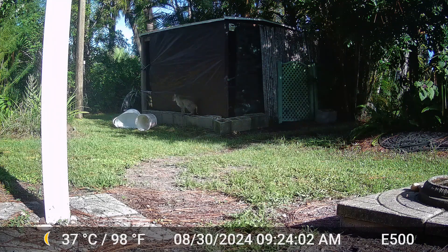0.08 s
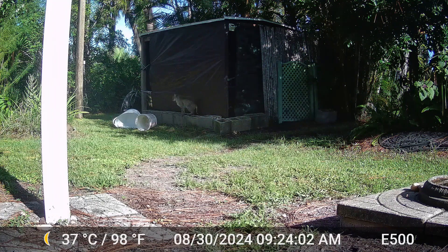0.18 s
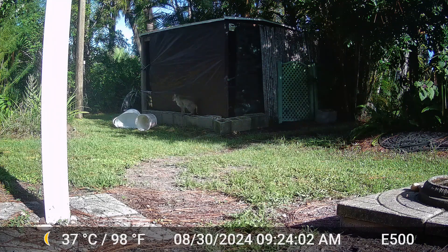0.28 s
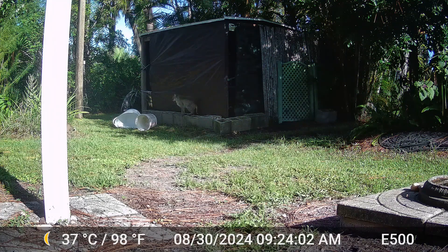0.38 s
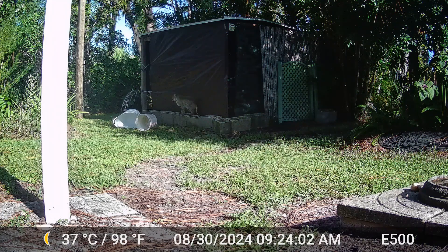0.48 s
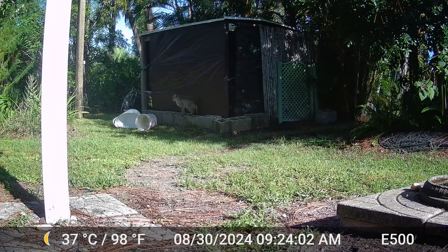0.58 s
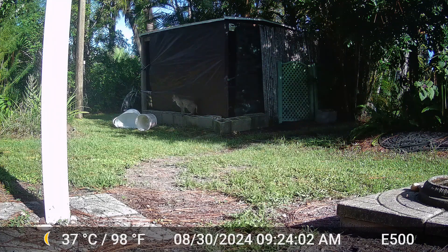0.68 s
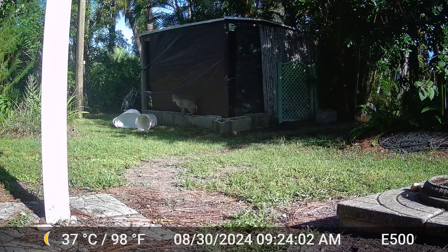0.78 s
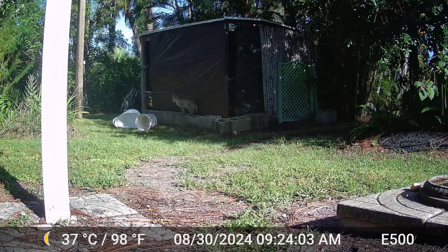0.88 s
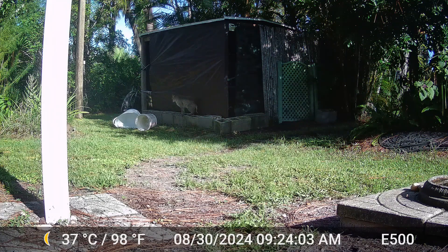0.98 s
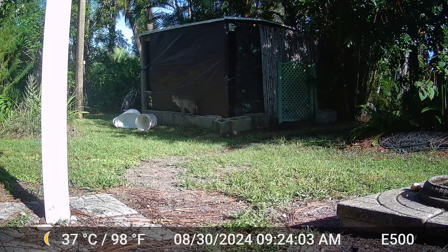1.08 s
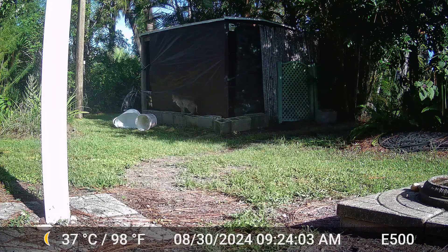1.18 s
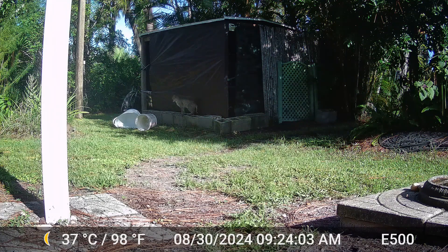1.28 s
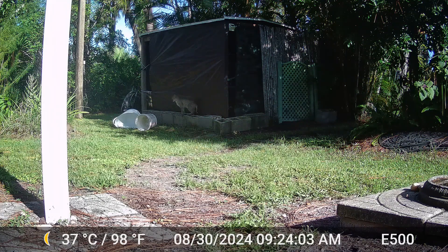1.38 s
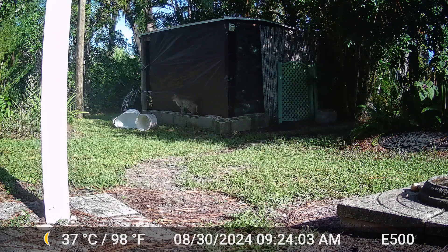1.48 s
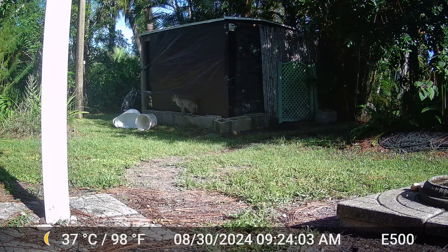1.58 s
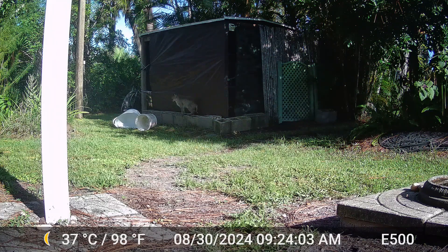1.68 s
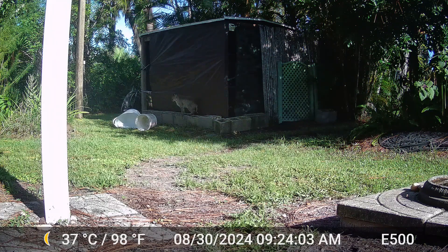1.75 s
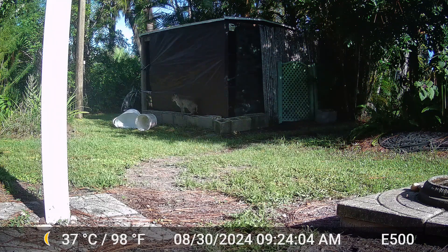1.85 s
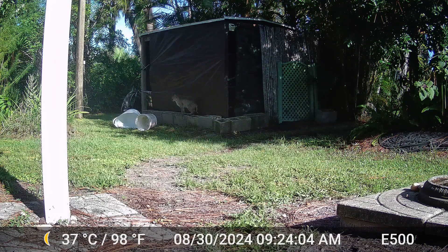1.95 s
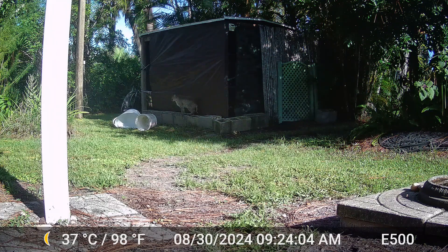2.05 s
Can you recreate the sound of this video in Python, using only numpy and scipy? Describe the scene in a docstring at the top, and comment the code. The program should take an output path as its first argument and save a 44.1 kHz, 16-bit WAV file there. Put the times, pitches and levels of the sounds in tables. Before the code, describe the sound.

Steady motor-like electronic buzzing, about thirty pulses a second, with irregular ticks and small spits of hiss; one loud crackle near the start, and a few dull, distant bucket knocks outdoors, on a noisy mono camera microphone.

```python
"""An outdoor camera's own electrical noise is the loudest part: a low flutter of one supply dip per frame,
irregular ticks, a throb and whine tied to the frame rate, spits of resonant hiss, one crackle of three deep dips.
Small animals nudge plastic buckets: a few faint, hollow knocks, each a handful of decaying sine modes.
Low rumble, housing resonances and thin hiss, all filtered noise, lie underneath."""
import sys
import numpy as np
from scipy import signal
from scipy.fft import rfft, irfft
from scipy.io import wavfile

SR = 44100
rng = np.random.default_rng(int(sys.argv[2]) if len(sys.argv) > 2 else 0)


def unload_wav(signal):
    """Save mono or channel-first audio to the path in sys.argv[1] as 16-bit WAV at rate SR, clipped to [-1, 1]."""
    wavfile.write(
        sys.argv[1],
        SR,
        np.round(np.clip(np.atleast_2d(signal).T, -1, 1) * 32767).astype(np.int16),
    )


N = 92610
T = np.arange(N) / SR
FRAME_HZ, FIRST_FRAME_S = 29.995, 0.0072
TICK_EDGE_S = 0.000097  # smoothing of frame ticks and stray ticks


def from_db(db):
    """Decibels to gain."""
    return 10 ** (np.asarray(db) / 20)


def rms_one(x):
    """Scale to unit power."""
    return x / np.sqrt(np.mean(x ** 2) + 1e-20)


def clicks(times_s, sizes):
    """Single-sample clicks at the given times."""
    at = np.round(np.asarray(times_s) * SR).astype(int)
    inside = (at >= 0) & (at < N)
    weights = (sizes * np.ones(len(at)))[inside]
    return np.bincount(at[inside], weights, N) + 1e-18


def soften(x, seconds):
    """One-pole smoothing with the given time constant."""
    r = np.exp(-1 / (seconds * SR))
    return signal.lfilter([1 - r], [1, -r], x)


def coloured_noise(spectrum):
    """Steady noise of the given spectrum, falling away above its last point; rms 1."""
    hz, db = np.transpose(spectrum)
    f = np.maximum(np.arange(N // 2 + 1) * SR / N, 1)
    gain = from_db(np.interp(np.log(f), np.log(hz), db))
    gain = gain / np.maximum(f / hz[-1], 1) ** 2
    return rms_one(irfft(rfft(rng.standard_normal(N)) * gain, N))


def resonant_noise(resonances):
    """Noise through two equal band-pass stages per resonance, each band at its own rms level."""
    out = 0
    for hz, width_hz, db in resonances:
        r = np.exp(-np.pi * width_hz / SR)
        section = [1 - r, 0, r - 1, 1, -2 * r * np.cos(2 * np.pi * hz / SR), r * r]
        band = signal.sosfilt([section, section], rng.standard_normal(N))
        out = out + from_db(db) * rms_one(band)
    return out


def coupling(edges):
    """Voltage steps pass the microphone input's high-pass: each jumps, sags and swings back."""
    corner_hz, q = 78.6, 0.75
    w = 2 * np.pi * corner_hz / SR
    b, a = signal.bilinear([1, 0, 0], [1, w / q, w * w], 1)
    return signal.lfilter(b, a, np.cumsum(edges))


def background(strength_db):
    """Low rumble that swells with the flutter, air coloured by the housing, and hiss."""
    # Spectra. Each row: frequency in Hz, relative density in dB per Hz.
    rumble_spectrum = [(20, 3.5), (35, -5), (60, 0.5), (115, -7.5), (160, -9), (230, -6), (380, -17),
                       (620, -25.5), (1000, -30)]
    hiss_spectrum = [(300, 7.5), (1000, -5.5), (2000, -8), (3200, -7), (5000, -10.5), (8000, -20),
                     (11000, -22), (13000, -28), (15500, -36)]
    # Housing resonances. Each row: frequency in Hz, width of one stage in Hz, level in dB.
    housing = [(460.3, 117, -59.5), (605.5, 166, -58.5), (810, 190, -65)]
    rumble_base_db, follow_db_per_db, hiss_db = -42.5, 0.64, -57
    rumble_gain = from_db(rumble_base_db + follow_db_per_db * strength_db)
    rumble = rumble_gain * coloured_noise(rumble_spectrum)
    hiss = from_db(hiss_db) * coloured_noise(hiss_spectrum)
    return rumble + resonant_noise(housing) + hiss


def stray_ticks():
    """Irregular electrical ticks: randomly timed decaying pulses of either polarity."""
    rate_per_s, median_db, spread_db, decay_s = 70, -45, 3.5, 0.0003
    born = rng.random(N) < rate_per_s / SR
    level_db = median_db + spread_db * np.clip(rng.standard_normal(N), -2, 2)
    impulses = born * rng.choice([-1, 1], N) * from_db(level_db) + 1e-18
    pulses = soften(impulses, decay_s) * decay_s * SR  # undo the smoothing's peak loss
    return soften(pulses, TICK_EDGE_S)


def throb():
    """Now and then a low hum swells up, two cycles to a frame."""
    # Swells. Each row: centre in seconds, Gaussian half width (to 1/e) in seconds, peak level in dB.
    throbs = [(0.01, 0.018, -36), (0.483, 0.014, -38), (0.774, 0.031, -29), (1.245, 0.031, -31.5),
              (1.316, .02, -29), (1.50, 0.027, -37.5)]
    crest_delay_s = 0.0078  # after a frame start
    swell = sum(from_db(db) * np.exp(-((T - s) / width_s) ** 2) for s, width_s, db in throbs)
    return swell * np.cos(2 * np.pi * 2 * FRAME_HZ * (T - FIRST_FRAME_S - crest_delay_s))


def whine():
    """Narrow-band noise restarts late in each frame and decays exponentially."""
    # Bands. Each row: frequency in Hz, width of one stage in Hz, level in dB before the decay.
    bands = [(5220, 400, -64.5), (10900, 720, -75)]
    delay_s, decay_s = 0.02, 0.006
    age_s = (T - FIRST_FRAME_S - delay_s) % (1 / FRAME_HZ)
    return np.exp(-age_s / decay_s) * resonant_noise(bands)


def flutter(strength_db):
    """Every frame steps the supply softly down, more firmly up, and adds a few thin ticks."""
    # Ticks in a frame. Each row: delay in seconds, level in dB, width in seconds, polarity.
    ticks = [(0.0002, -43.5, 0.00056, -1), (0.0058, -37, 0.00026, 1), (0.0199, -37.5, 0.00033, -1)]
    dip_s, fall_s, rise_s = 0.0073, 0.00072, 0.00032
    fall_db, rise_db = -31, -21.5  # step sizes at 0 dB strength
    strength_jitter_db, tick_jitter_db = 0.32, 1.5
    starts_s = FIRST_FRAME_S + np.arange(int(N / SR * FRAME_HZ) + 1) / FRAME_HZ
    frames = len(starts_s)
    frame_db = np.interp(starts_s, T, strength_db)
    size = from_db(frame_db + strength_jitter_db * rng.standard_normal(frames))
    rises = clicks(starts_s + dip_s, size * from_db(rise_db))
    falls = clicks(starts_s, size * from_db(fall_db))
    edges = soften(soften(rises, rise_s), rise_s) - soften(falls, fall_s)
    for delay_s, db, width_s, polarity in ticks:
        step = np.sign(polarity) * from_db(db + tick_jitter_db * rng.standard_normal(frames))
        pulse = clicks(starts_s + delay_s, step) - clicks(starts_s + delay_s + width_s, step)
        edges = edges + soften(pulse, TICK_EDGE_S)
    return coupling(edges)


def buckets():
    """Each knock pushes a bucket's wall for a few cycles, then its modes ring down briefly."""
    # Knocks. Each row: start in seconds, level in dB, pitch of the hollow in Hz.
    knocks = [(0.118, -34, 157.2), (0.578, -38, 460), (0.642, -36, 452), (1.107, -31.5, 611),
              (1.216, -35, 626), (1.372, -40, 585), (1.776, -38.5, 787)]
    # Modes. Each row: multiple of the pitch, level relative to the knock in dB, t60 in seconds.
    modes = [(1, -2.5, 0.05), (1.24, -21, 0.04), (2.2, -22, .04)]
    contact_s, contact_cycles = 0.0015, 3.6  # added together: length of the push
    out = np.zeros(N)
    for s, db, pitch_hz in knocks:
        age_s = np.maximum(T - s, 0)
        push_s = contact_cycles / pitch_hz + contact_s
        attack = np.minimum(age_s / push_s, 1)
        for multiple, mode_db, t60_s in modes:
            decay_db = 60 * np.maximum(age_s - push_s, 0) / t60_s
            envelope = attack * from_db(db + mode_db - decay_db)
            out += envelope * np.sin(2 * np.pi * pitch_hz * multiple * age_s)
    return out


def spits():
    """Short flickering bursts of resonant electronic hiss, each opening with a decaying zip."""
    # Spits. Each row: start in seconds, length in seconds, level in dB.
    bursts = [(0.179, 0.022, -57), (0.214, 0.059, -50), (0.286, 0.044, -54.5), (0.622, 0.025, -56),
              (1.071, 0.023, -57), (1.203, 0.022, -57.5), (1.323, 0.02, -57.5), (1.772, 0.02, -57)]
    # Resonances of hiss and zip. Each row: frequency in Hz, width of one stage in Hz, dB re spit level.
    hiss_tones = [(1480, 1700, -4.5), (3070, 760, -6), (4470, 1900, -10.5), (6570, 1200, -17.5),
                  (8100, 1200, -19), (11000, 3400, -20), (12950, 400, -24)]
    zip_tones = [(4550, 260, 2.5), (11740, 450, -9.5)]
    edge_s, flicker_rms_db, zip_decay_s = 0.0014, 3.5, 0.004
    gate = sum(from_db(db) * ((T > s) & (T < s + length_s)) for s, length_s, db in bursts)
    flicker = rms_one(soften(soften(rng.standard_normal(N), edge_s), edge_s))
    envelope = soften(gate + 1e-18, edge_s) * from_db(flicker_rms_db * flicker)
    zips = sum(from_db(db) * (T > s) * np.exp(-np.abs(T - s) / zip_decay_s) for s, _, db in bursts)
    return envelope * resonant_noise(hiss_tones) + zips * resonant_noise(zip_tones)


def crackle():
    """The supply drops, flicks back at evenly spaced retries, then snaps up again."""
    # Supply dips. Each row: start in seconds, length in seconds, step size in dB.
    dips = [(0.22596, 0.00638, -4.7), (0.23809, 0.00407, -4.8), (0.24485, 0.00411, -4.6)]
    retry_s = 0.00206  # nominal; each dip is split into a whole number of intervals
    fall_s, rise_s = 0.00017, 0.00006
    spike_s, spike_fall_s, spike_db = 0.000136, 0.000075, -7.5
    start_s, length_s, db = np.transpose(dips)
    depth = from_db(db)
    retries_s = []
    for s, span_s, _ in dips:
        intervals = int(round(span_s / retry_s))
        retries_s.append(np.linspace(s, s + span_s, intervals + 1)[1:-1])
    retries_s = np.concatenate(retries_s)
    # the return step is smaller, so each flick leaves a small rise
    spike_up = soften(clicks(retries_s - spike_s / 2, 0.98), rise_s)
    spike_down = soften(clicks(retries_s + spike_s / 2, 0.77), spike_fall_s)
    rises = soften(clicks(start_s + length_s, depth), rise_s)
    falls = soften(clicks(start_s, depth), fall_s)
    return coupling(rises - falls + from_db(spike_db) * (spike_up - spike_down))


def scene():
    """Faint buckets under the camera's own noise, in mono."""
    # Flutter strength. Each row: time in seconds, strength in dB.
    flutter_curve = [(0.02, 0.7), (0.08, 0), (0.28, 2.4), (0.48, 0.7), (0.65, -1), (0.78, 3), (0.88, 1.5),
                     (1.08, 1.2), (1.18, -1.5), (1.25, 2), (1.32, 2.5), (1.38, 2), (1.48, 0.6),
                     (1.58, -0.7), (1.68, 0.7), (1.92, -1.5), (1.98, 2.5), (2.08, 0.8)]
    strength_db = np.interp(T, *np.transpose(flutter_curve))
    electronics = stray_ticks() + throb() + whine() + flutter(strength_db) + spits() + crackle()
    return (background(strength_db) + electronics + buckets())[None]


def record(dry):
    """A gentle treble roll-off, then a steep low-pass."""
    rolloff_hz, stopband_hz = 11800, 16900
    dull = signal.sosfilt(signal.butter(2, rolloff_hz, fs=SR, output="sos"), dry)
    return signal.sosfilt(signal.cheby2(10, 50, stopband_hz, fs=SR, output="sos"), dull)


dry = scene()
out = record(dry)
unload_wav(out)
```